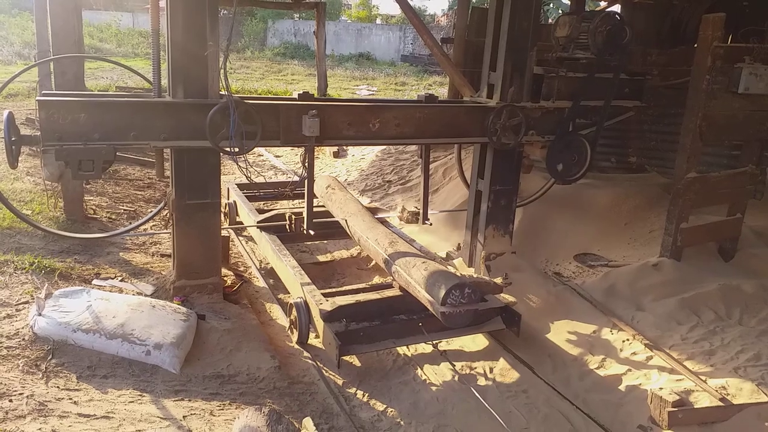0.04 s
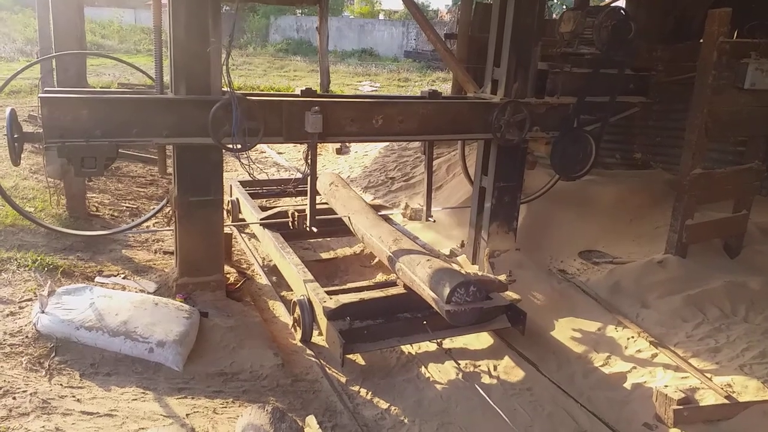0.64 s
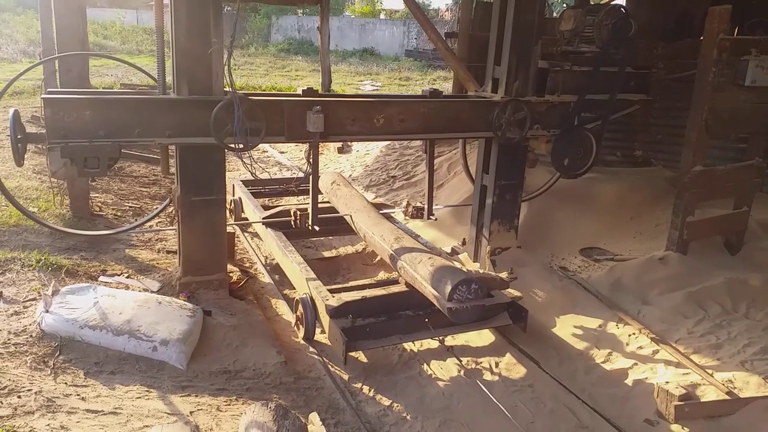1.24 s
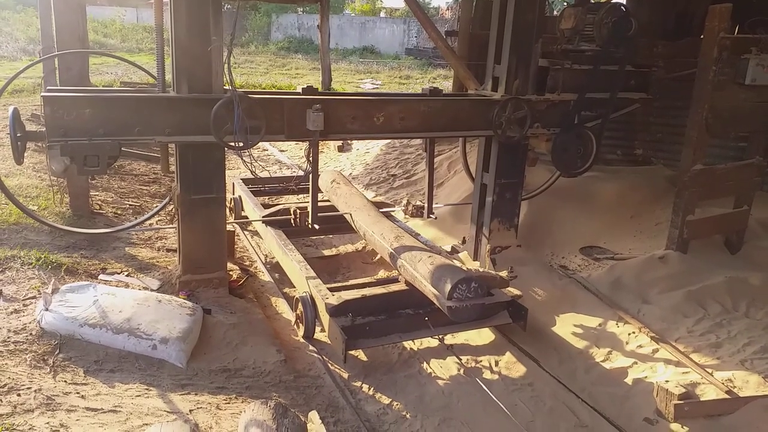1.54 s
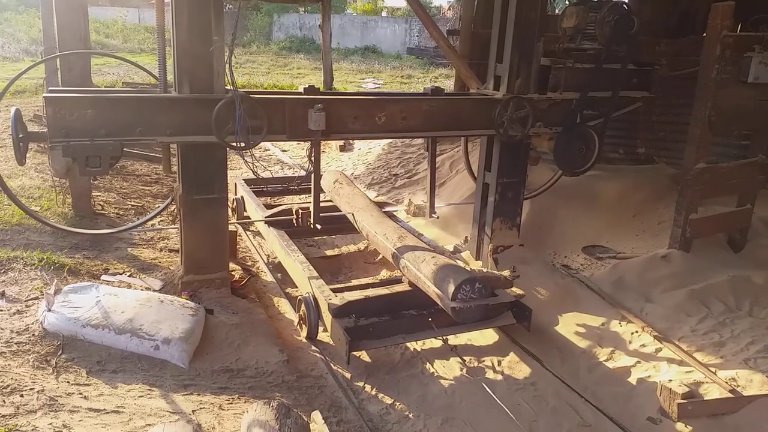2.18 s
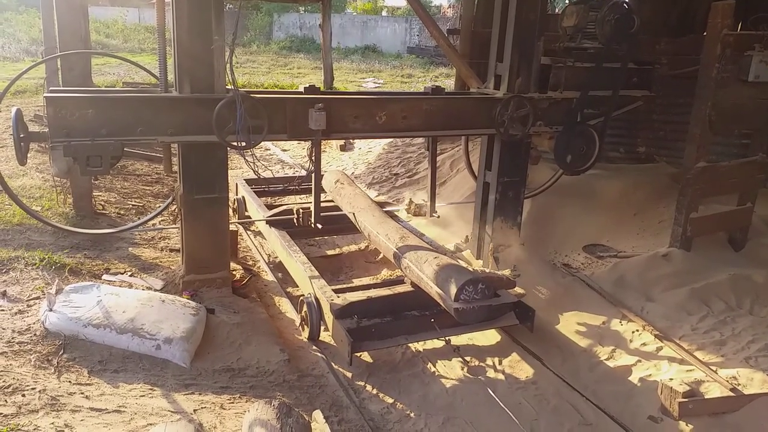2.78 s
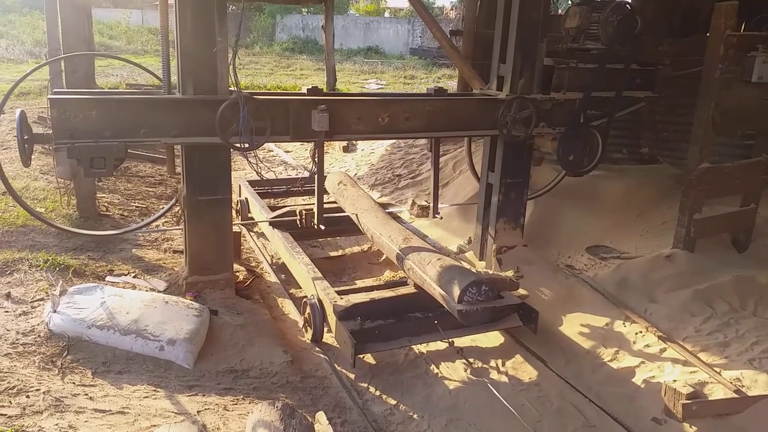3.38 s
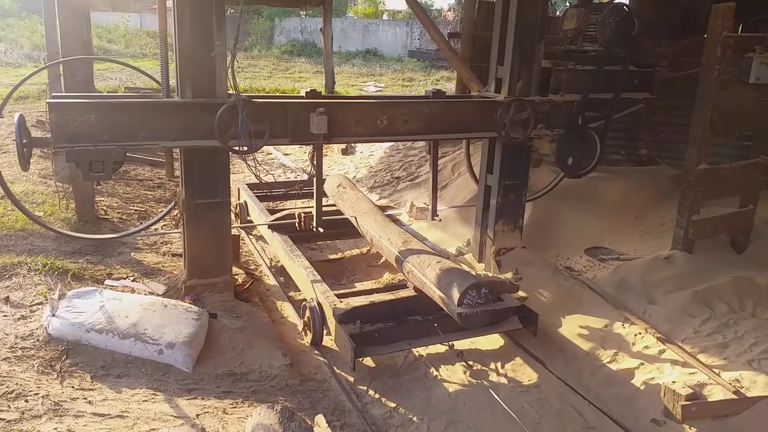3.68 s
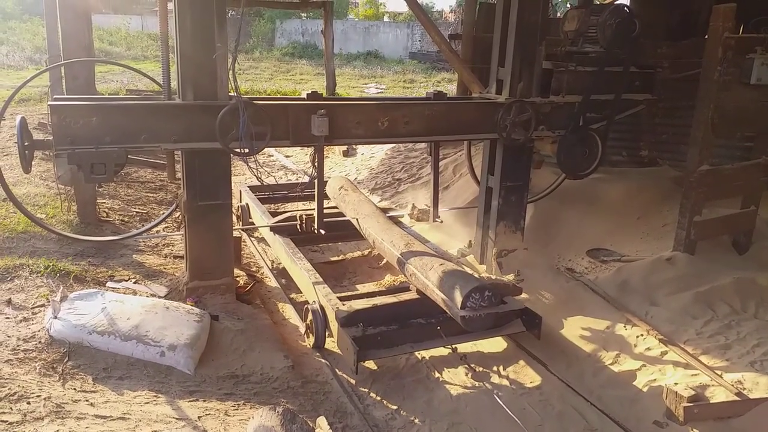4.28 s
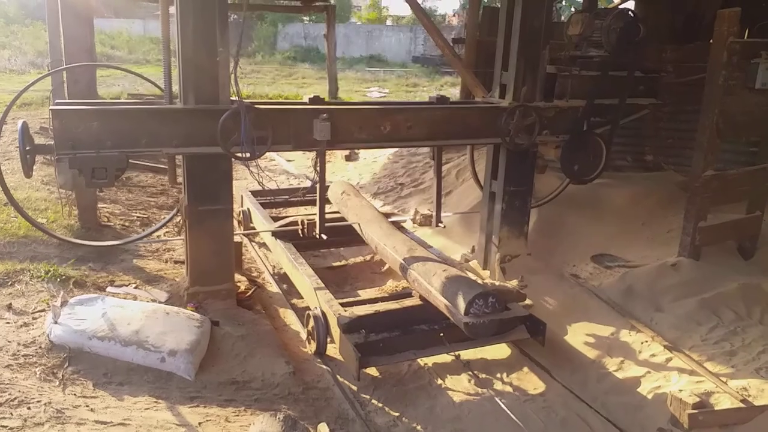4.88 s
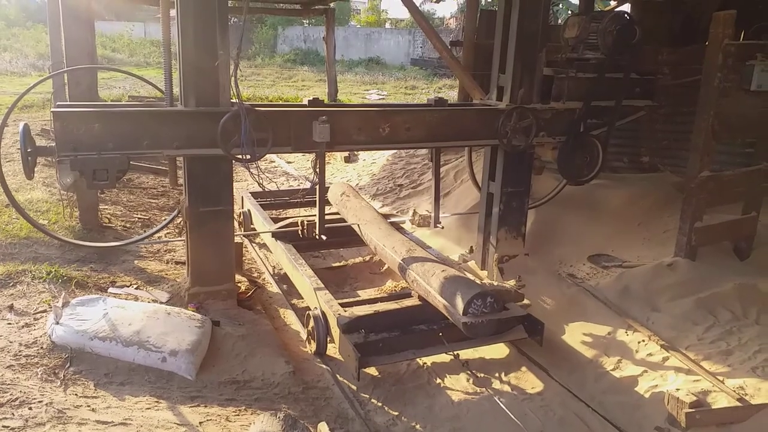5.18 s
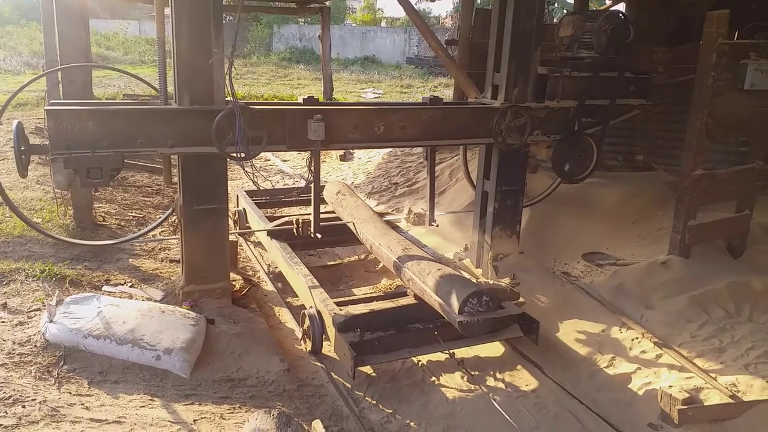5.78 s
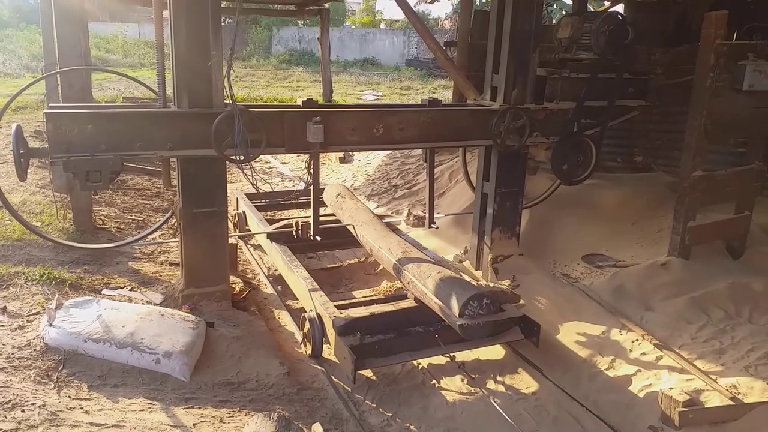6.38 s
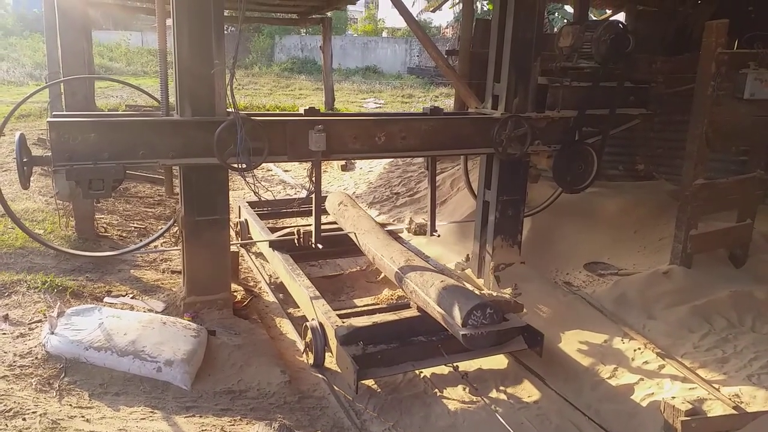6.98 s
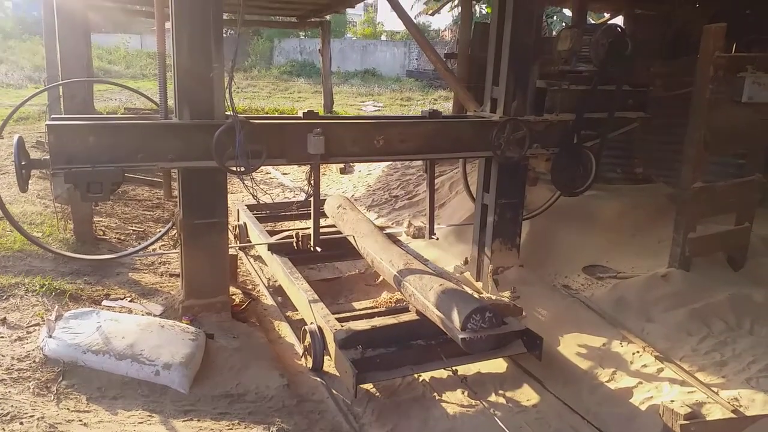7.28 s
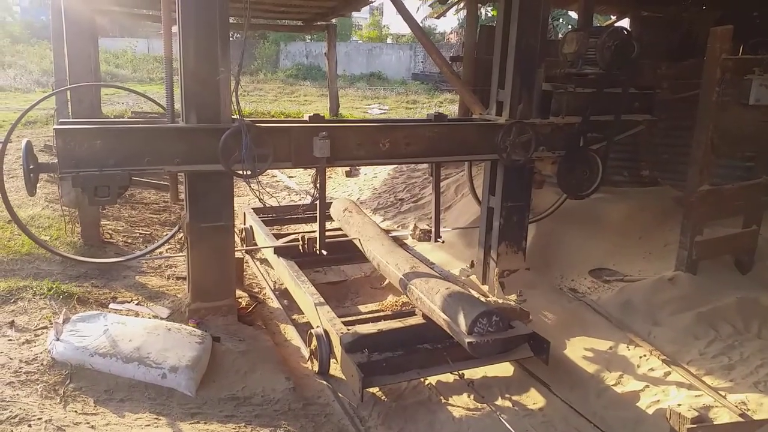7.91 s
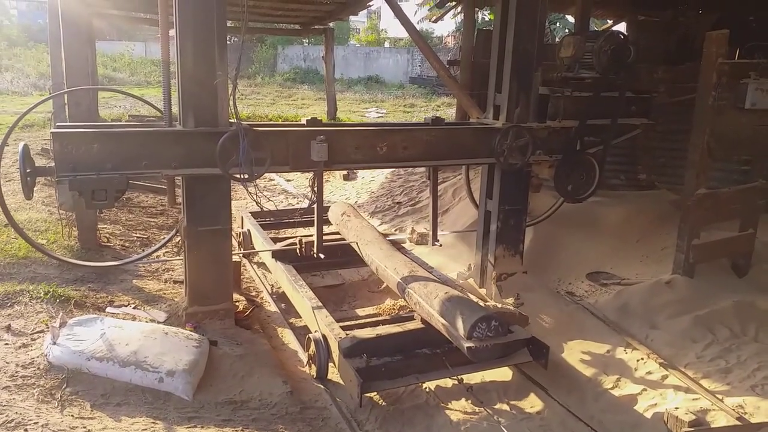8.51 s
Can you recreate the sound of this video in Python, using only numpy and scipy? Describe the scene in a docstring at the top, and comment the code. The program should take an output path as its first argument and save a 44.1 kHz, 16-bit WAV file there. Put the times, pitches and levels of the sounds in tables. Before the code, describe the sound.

From a few metres away in a sawmill shed, a band blade hisses steadily through a log, its steel ringing and whining above a low machine rumble and faint electric hum. The grainy rasp of the wood turns hollow in places and harsher in others, with a fine high spray of sawdust on top. Late on, a loose piece of wood rattles quickly and knocks once more as the sawing continues.

```python
"""Band sawmill cutting a log

In an open shed, heard in mono from a few metres, teeth snap wood fibres, a little harder once per lap
of the band. Hard and hollow stretches colour the cut, friction excites the steel's modes, and sawdust
sprays from a kerf that chokes twice. Wheels and frame rumble over a faint mains hum, and late in the
cut a loose piece of wood clatters."""
import sys
import numpy as np
from scipy import signal
from scipy.fft import rfft, irfft, next_fast_len
from scipy.io import wavfile

SR = 44100
rng = np.random.default_rng(int(sys.argv[2]) if len(sys.argv) > 2 else 0)


def digitize_waveform(pressure):
    """Quantize a signal to 16-bit integers and store it at the path in sys.argv[1].

    Rows of a 2-D input are taken as channels; values are limited to [-1, 1].
    """
    field = np.atleast_2d(pressure).T
    bounded = np.clip(field, -1, 1)
    quanta = np.round(bounded * 32767).astype(np.int16)
    wavfile.write(sys.argv[1], SR, quanta)


N = 381465
TIME = np.arange(N) / SR


def from_db(db):
    """Amplitude grows tenfold every 20 dB."""
    return 10 ** (np.asarray(db) / 20)


def rms_one(x):
    """Normalisation to unit power."""
    return x / np.sqrt(np.mean(x ** 2) + 1e-20)


def noise():
    """White noise: equal power per hertz."""
    return rng.standard_normal(N)


def drift(rate_hz):
    """Low-passed noise gives a slow random fluctuation; rms 1."""
    step = 40
    pole = np.exp(-2 * np.pi * rate_hz * step / SR)
    slow = signal.lfilter([1], [1, -2 * pole, pole * pole], rng.standard_normal(N // step + 2002))[2000:]
    return np.interp(np.arange(N) / step, np.arange(len(slow)), rms_one(slow))


def in_time(rows):
    """Linear interpolation of a level curve."""
    return np.interp(TIME, *np.transpose(rows))


def swell(start, end, rise_s, fall_s):
    """A trapezoidal envelope, equal to 1 from start to end."""
    return np.clip(np.minimum(1 + (TIME - start) / rise_s, 1 - (TIME - end) / fall_s), 0, 1)


def stretches(rows, rise_s, fall_s):
    """The upper envelope of several held swells, in dB."""
    return np.max([db * swell(start, end, rise_s, fall_s) for start, end, db in rows], axis=0)


def coloured(x, spectrum):
    """Filtering imposes a spectral envelope; rms 1."""
    size = next_fast_len(N)
    hz, db = np.transpose(spectrum)
    bins = np.maximum(np.arange(size // 2 + 1) * SR / size, 1)
    gain = from_db(np.interp(np.log(bins), np.log(hz), db))
    gain *= np.minimum(bins / hz[0], 1) ** 2 * np.minimum(hz[-1] / bins, 1) ** 2   # both ends fall away
    return rms_one(irfft(rfft(x, size) * gain, size)[:N])


def resonate(x, hz, width_hz):
    """A damped resonator with unit peak gain."""
    r = np.exp(-np.pi * width_hz / SR)
    feedback = [1, -2 * r * np.cos(2 * np.pi * hz / SR), r * r]
    return signal.lfilter(np.array([1, 0, -1]) * (1 - r * r) / 2, feedback, x + 1e-18)


def narrow_noise(hz, width_hz):
    """Two resonators in cascade narrow noise to a grainy note."""
    return resonate(resonate(noise(), hz, width_hz), hz, width_hz)


def grains(per_s, spread_db, wash_db):
    """Shot noise: tiny uneven snaps, over the smooth wash that the shed makes of them."""
    sizes = from_db(spread_db * np.minimum(rng.exponential(1, N), 4)) * rng.choice([-1, 1], N)
    snaps = sizes * (rng.random(N) < per_s / SR)
    return rms_one(snaps) + from_db(wash_db) * noise()


def lap(depth_db, lap_hz=3.69, peak_s=0.052):
    """Amplitude modulation: the band bites deeper once per trip round the wheels."""
    return depth_db * np.cos(2 * np.pi * lap_hz * (TIME - peak_s))


def squeal(hz, width_hz, sway_hz, jitter_hz):
    """Frequency modulation: the flexing band bends the pitch of narrow-band noise; rms 1."""
    flex = np.cos(2 * np.pi * 4.04 * (TIME - .213))
    pitch_hz = hz + sway_hz * flex + jitter_hz * drift(16)
    phase = 2 * np.pi * np.cumsum(pitch_hz) / SR
    return rms_one(drift(width_hz) * np.cos(phase) + drift(width_hz) * np.sin(phase))


# Hard stretches of the log: start_s, end_s, load_db
HARD_WOOD = [(0, 0.02, 1.8), (2.6, 2.8, 1.0), (4.65, 5.25, 5.5), (5.6, 6.3, 2), (7.05, 7.15, 5.4),
             (7.5, 8.2, 2.1)]


def load():
    """Cutting resistance: harder wood puts extra load on the teeth, in dB."""
    return stretches(HARD_WOOD, rise_s=0.76, fall_s=1.15)


# Snags of the band: peak_s, boost_db
SNAGS = [(7.06, .8), (7.37, 1.5), (8.5, 1.3)]


def snags():
    """Transient loading: cut and steel flare as the band snags, in dB."""
    return sum(db * swell(s, s, rise_s=0.088, fall_s=0.088) for s, db in SNAGS)


# Blockages of the kerf: peak_s, spray_loss_db, closing_s, clearing_s
CHOKES = [(0.38, 4.5, .15, .17), (2.88, 4, 0.037, 1.0)]


def choking():
    """Obstructed flow: dust packs the kerf, then clears; loss in dB."""
    return sum(db * swell(s, s, closing_s, clearing_s) for s, db, closing_s, clearing_s in CHOKES)


# Rubbing on the kerf walls: time_s, relative_level_db
WALL_FRICTION = [(0, -22.5), (1.4, -21), (2.0, -17), (2.85, -21), (3.4, -21), (4.3, -15.5), (4.8, -19),
                 (5.2, -19), (5.42, -21.5), (5.98, -15), (6.75, -16.3), (7.2, -20), (7.8, -19.5),
                 (8.5, -15.5)]


def friction():
    """Sliding friction of band on wood varies along the cut, in dB."""
    return in_time(WALL_FRICTION)


# Rumble of wheels and frame: time_s, level_db
RUMBLE_LEVEL = [(0, -31), (3.2, -31.5), (4, -29.5), (6.5, -29.3), (8.65, -30.5)]
# Its spectrum: frequency_hz, relative_density_db
RUMBLE_SPECTRUM = [(25, -42), (42, -32), (65, -22), (105, -9), (140, -8.5), (170, -2.5), (215, 1),
                   (250, -10.5), (305, -8), (390, -12), (560, -9.5), (780, -11), (1020, -8), (1300, -20)]


def machine(mains_hz=50):
    """Forced vibration: wheels shake the frame, which drones under load; the motor hums at twice mains."""
    rumble = from_db(in_time(RUMBLE_LEVEL)) * coloured(noise(), RUMBLE_SPECTRUM)
    drone = from_db(-58.5 + 2.2 * load()) * rms_one(narrow_noise(hz=608, width_hz=10))
    hum = from_db(-55 + 1.5 * drift(2.2)) * rms_one(np.sin(2 * np.pi * 2 * mains_hz * TIME))
    return rumble + drone + hum


# Strikes of the loose piece: time_s, strength_db
KNOCKS = [(7.186, -10), (7.194, -5.5), (7.205, -9.5), (7.218, -9), (7.231, -8.5), (7.242, -10),
          (7.253, -11), (7.263, -10), (7.273, -17), (7.285, -17), (7.32, -15), (7.486, -8.5)]


def contacts(sharp_hz=1400, settled_hz=680, settle_s=0.037, rest_s=.1):
    """Exponential settling: knocks grow duller, and start sharp again after a rest."""
    first = last = 0
    for s, db in KNOCKS:
        if s - last > rest_s:
            first = s
        last = s
        yield s, db, settled_hz + (sharp_hz - settled_hz) * np.exp((first - s) / settle_s)


# Modes of the loose piece: frequency_hz, width_hz, gain_db
WOOD_MODES = [(298, 32, 5), (426, 50, -4), (568, 60, -4.5), (720, 85, -4.5), (896, 41, -2.5),
              (1070, 70, -9), (1160, 44, -5.5), (1327, 59, -4)]


def clatter(crunch_s=0.0099, shed_t60_s=0.48):
    """Impact excitation: a blow, a short crunch and the shed's tail drive the modes of the wood."""
    force = np.zeros(N)
    for s, db, hz in contacts():
        age = np.maximum(TIME - s, 0)
        blow = from_db(4.5) * np.sin(2 * np.pi * hz * age) * np.exp(-np.minimum(hz * age, 20))
        fade = np.exp(-age / crunch_s) + from_db(-14.5 - 60 * np.minimum(age / shed_t60_s, 2))
        crunch = fade * rms_one(resonate(noise(), hz, hz * 0.6))
        force += from_db(db) * (TIME >= s) * (blow + crunch)
    body = sum(from_db(db) * resonate(force, hz, width_hz) for hz, width_hz, db in WOOD_MODES)
    return body + from_db(-13.5) * force


# Dust streaming freely: start_s, end_s, boost_db
GUSHES = [(0, 2.83, 4.5), (4.0, 4.3, 1.0), (5.5, 8, 1), (8.25, 8.65, 3.1)]
# Spray of chips: frequency_hz, relative_density_db
SPRAY_SPECTRUM = [(7000, -27), (9500, -12.5), (10700, -8), (11100, -0.5), (11500, 1), (12300, 0),
                  (13600, 1), (14800, 2), (15800, 1)]


def sawdust():
    """Flow noise: chips and air leave the kerf, with a thin whistle that sways with the band."""
    rub_db = friction()
    spray_db = -21.5 + stretches(GUSHES, rise_s=.1, fall_s=.04) - choking()
    spray_db += .12 * (rub_db - rub_db.mean())
    chips = coloured(grains(per_s=7000, spread_db=6, wash_db=9), SPRAY_SPECTRUM)
    whistle = from_db(-15) * squeal(hz=11330, width_hz=70, sway_hz=189, jitter_hz=90)
    return from_db(spray_db + lap(depth_db=0.14) + 0.82 * drift(16)) * (chips + whistle)


def whine(swell_db=4.5, period_s=2.33, peak_s=0.57):
    """Resonance: a low mode of the band sings, swelling and fading in a slow cycle."""
    cycle = np.cos(2 * np.pi * (TIME - peak_s) / period_s)
    level_db = -31.5 + swell_db * cycle + 1.3 * drift(6.1)
    return from_db(level_db) * rms_one(narrow_noise(hz=1783, width_hz=75))


# Modes of the band: frequency_hz, resonator_width_hz, gain_db
STEEL_MODES = [(1785, 164, -4), (1932, 70, -9), (2332, 71, -1.5), (2450, 79, -7.5), (2690, 79, -3),
               (2820, 79, -5.5), (4686, 94, -2.5), (6064, 170, -1.5), (6254, 370, -2.5)]
# Hiss of the band: frequency_hz, relative_density_db
HISS_SPECTRUM = [(4000, -13), (5700, -5), (6500, 1), (7200, 0), (7800, -6), (8500, -14.5), (9800, -12),
                 (10800, -10.5), (16000, -24)]


def steel():
    """Friction excites modes: the scraped band rings, squeals and hisses; packed sawdust damps it."""
    ring = sum(narrow_noise(hz, width_hz) * from_db(db + 1.4 * drift(10))
               for hz, width_hz, db in STEEL_MODES)
    shriek_db = -8 + 0.55 * drift(21) + 0.8 * drift(3.4)
    shriek = from_db(shriek_db) * squeal(hz=6206, width_hz=55, sway_hz=45.3, jitter_hz=114.8)
    hiss_db = -4.5 + lap(depth_db=0.35) + 0.5 * drift(15)
    hiss = from_db(hiss_db) * coloured(grains(per_s=5000, spread_db=2.5, wash_db=1), HISS_SPECTRUM)
    steel_db = -16 + snags() - .65 * choking()
    return from_db(steel_db) * (from_db(-4.5) * rms_one(ring) + shriek + hiss)


# Stretches where the log resounds hollowly: start_s, end_s, rasp_boost_db
HOLLOW_WOOD = [(0.75, 2.1, 6), (3.1, 3.7, 4), (5.78, 6.2, 8.5), (6.48, 6.53, 6.5), (7.45, 8.65, 6)]
# Rasp of the log, bite of the teeth, rub of the band: frequency_hz, relative_density_db
RASP_SPECTRUM = [(600, -28), (950, -13.5), (1200, -2.5), (1330, -1), (1410, -3), (1600, 2), (1850, -4),
                 (2150, -7), (3000, -35)]
BITE_SPECTRUM = [(800, -23), (1110, -5.5), (1250, -15.5), (1400, -19), (1650, -8.5), (1950, -2),
                 (2160, -5.5), (2400, 0.5), (3000, 0), (4200, -.5), (4800, -5.5), (6000, -6.5), (9000, -33)]
RUB_SPECTRUM = [(3600, -25), (4400, -3.5), (4750, -1), (5000, 2.5), (5250, -4.5), (5420, -1), (5750, -9.5),
                (6500, -14), (9000, -21)]


def cutting():
    """Fracture and friction: teeth snap fibres, the log rasps hollowly, the band rubs the kerf walls."""
    effort_db = lap(depth_db=.5) + snags() + 0.41 * drift(30)   # the wood is unevenly hard
    rasp_db = -28.5 - 0.33 * load() + stretches(HOLLOW_WOOD, rise_s=0.44, fall_s=.2) + 0.77 * drift(7.8)
    rasp = from_db(rasp_db) * coloured(grains(per_s=1400, spread_db=3, wash_db=-1.5), RASP_SPECTRUM)
    bite = from_db(-20 + load()) * coloured(grains(per_s=3500, spread_db=1.5, wash_db=1.5), BITE_SPECTRUM)
    rub = from_db(friction() - 3 + 0.65 * drift(4)) * coloured(noise(), RUB_SPECTRUM)
    return from_db(effort_db) * (rasp + bite + rub)


def scene():
    """Superposition: all sources add at one point."""
    mono = from_db(-1) * clatter() + cutting() + steel() + whine() + sawdust() + machine()
    return np.array([mono, mono])


def record(dry):
    """Clipping limits the highest peaks, and a steep low-pass limits the bandwidth."""
    cutoff_hz = 15800
    low_pass = signal.ellip(14, .05, 80, cutoff_hz, fs=SR, output="sos")
    return signal.sosfilt(low_pass, np.clip(dry, -.95, .95))


dry = scene()
out = record(dry)
digitize_waveform(out)
```